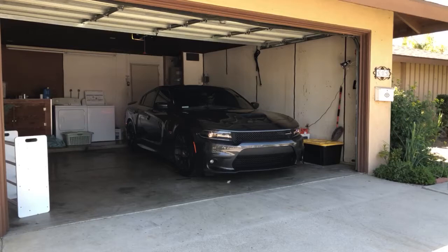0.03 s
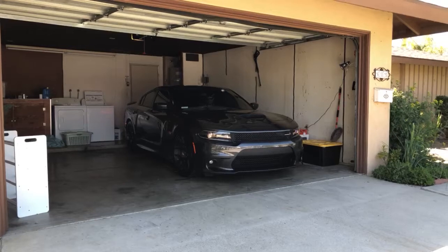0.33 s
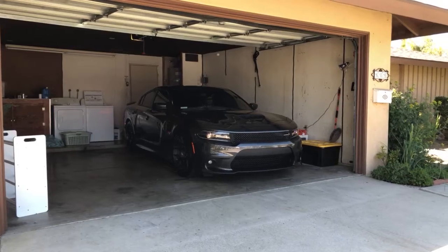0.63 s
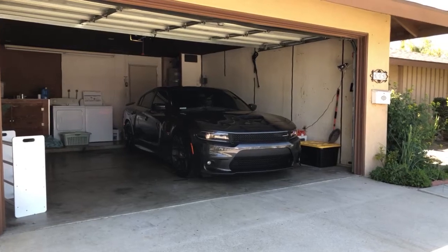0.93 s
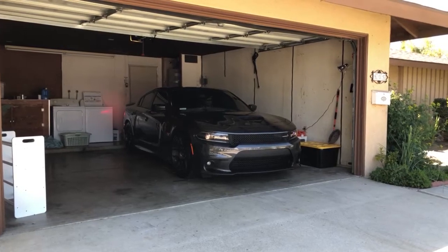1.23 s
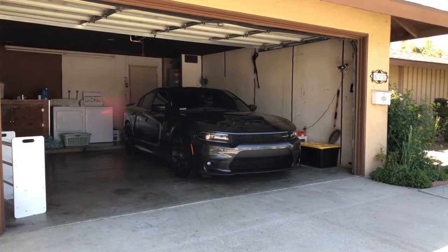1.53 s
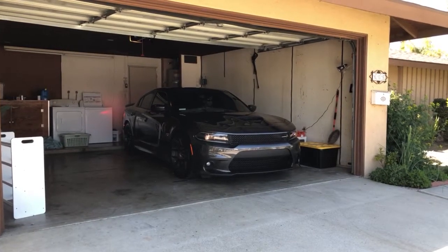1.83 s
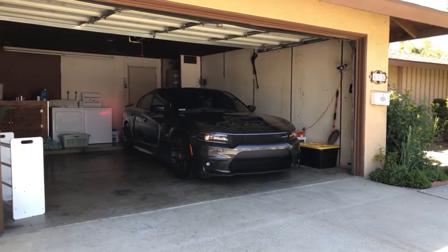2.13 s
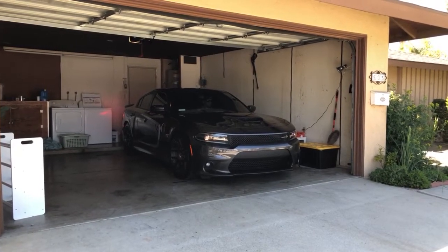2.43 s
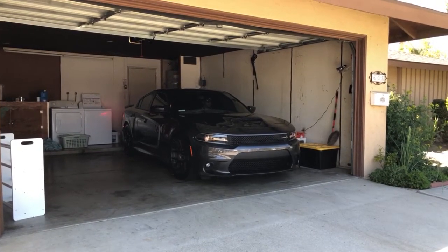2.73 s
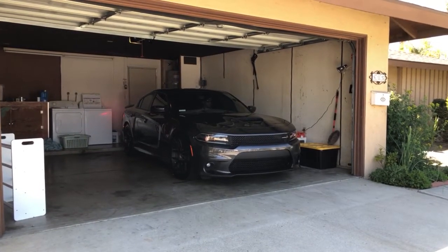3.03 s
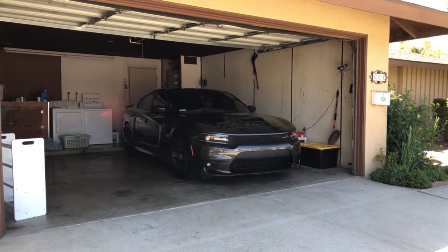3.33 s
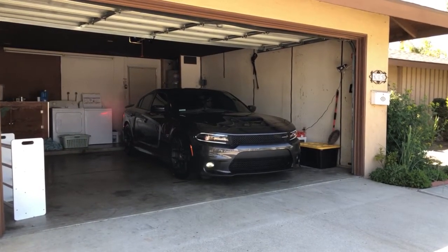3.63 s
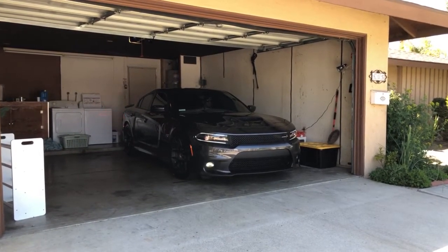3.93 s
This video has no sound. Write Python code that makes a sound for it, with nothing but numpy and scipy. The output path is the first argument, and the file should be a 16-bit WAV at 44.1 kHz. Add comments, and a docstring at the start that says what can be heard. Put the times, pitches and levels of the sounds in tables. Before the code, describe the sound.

A car engine starts up in an open garage, following quiet chirps and a low hum.

```python
"""An open garage, heard from the driveway: a V8 car starts from cold.
Small birds chirp and a far dove coos over a low neighbourhood hum. The starter pinion clacks in and its
gears grind through a few compression strokes. The engine catches, flares with a bark and settles,
each firing sending a pulse and a puff of gas down the pipes to boom between the garage walls."""
import sys
import numpy as np
from scipy import signal
from scipy.fft import rfft, irfft, next_fast_len
from scipy.io import wavfile
from scipy.ndimage import uniform_filter1d, map_coordinates

SR = 44100
rng = np.random.default_rng(int(sys.argv[2]) if len(sys.argv) > 2 else 0)


def dump(signal):
    """Clip the signal to [-1, 1] and save it as 16-bit WAV at the path in sys.argv[1]."""
    limited = np.clip(np.atleast_2d(signal).T, -1, 1)
    pcm = np.round(limited * 32767).astype(np.int16)
    wavfile.write(sys.argv[1], SR, pcm)


N = 176400

ENGAGE_S, RELEASE_S = 2.802, 3.56  # the starter goes in and lets go
# Reverb of the yard and of the garage. Each row: frequency in Hz, seconds to die by 60 dB.
YARD_DECAY = [(300, 0.63), (4000, 0.99), (12000, 0.58)]
GARAGE_DECAY = [(60, 0.49), (300, 0.4), (2000, 0.44), (6000, 0.3), (15000, 0.24)]


def amp(db):
    return 10 ** (np.asarray(db) / 20)


def unit(x):
    return x / np.sqrt(np.mean(x ** 2) + 1e-20)


def clock():
    return np.arange(N) / SR


def along(points, hz):
    """Read (Hz, value) points on a log frequency axis."""
    freqs, values = np.transpose(points)
    return np.interp(np.log(hz + 1), np.log(freqs + 1), values)


def curves(rows):
    """One automation curve for each column after the time."""
    times, *columns = np.transpose(rows)
    return [np.interp(clock(), times, column) for column in columns]


def wobble(rate):
    """A smooth random curve, rate knots a second."""
    knots = rng.standard_normal(int(N * rate / SR) + 4)
    return map_coordinates(knots, [np.arange(N) * rate / SR])


def filtered(x, response):
    """x through a complex frequency response."""
    size = next_fast_len(N + SR)
    return irfft(rfft(x, size) * response(np.fft.rfftfreq(size, 1 / SR)), size)[:N]


def colour(x, *spectra):
    """x through one or more (Hz, dB) EQ curves."""
    return filtered(x, lambda hz: amp(sum(along(s, hz) for s in spectra)))


def noise(*spectra):
    """Coloured noise of rms 1."""
    return unit(colour(rng.standard_normal(N), *spectra))


def resonate(x, modes):
    """x through a bank of resonances of alternating polarity."""
    return filtered(x, lambda f: sum(
        (-1) ** k * amp(db) * 1j * f * width / (centre ** 2 - f ** 2 + 1j * f * width)
        for k, (centre, width, db) in enumerate(modes)))


def steady(x, size=1500):
    """x levelled to a running rms of 1."""
    return x / np.sqrt(np.abs(uniform_filter1d(x * x, size)) + 1e-5 * np.mean(x * x))


def gate(start, rise, hold=9, fall=1):
    """Attack, hold and exponential release, in seconds."""
    t = clock() - start
    return np.clip(t / rise, 0, 1) * np.exp(-np.maximum(t - hold, 0) / fall)


def room(x, decay, wet):
    """x with a diffuse tail in which each frequency dies at its own speed."""
    hz, t, spectrum = signal.stft(rng.standard_normal(SR), SR, nperseg=256)
    fade = amp(-60 * t / along(decay, hz)[:, None])
    tail = signal.istft(spectrum * fade, SR, nperseg=256)[1]
    return x + wet * signal.fftconvolve(x, tail / np.linalg.norm(tail))[:N]


def neighbourhood():
    """The bed: distant rumble, faint hiss and the wavering hum of a machine."""
    # Outdoor air. Each row: frequency in Hz, gain in dB.
    rumble_eq = [(15, -53), (28, -33), (42, -6.5), (68, -13.5), (90, -1), (135, 0), (157, -8.5), (185, -5),
                 (207, -13), (232, -9.5), (270, -17.5), (295, -16.5), (340, -17.5), (380, -25.5),
                 (700, -27), (1200, -28), (1900, -37), (2700, -48.5), (5000, -54.5)]
    hiss_eq = [(1000, -25), (2500, 2), (6000, 6), (9000, -16), (15000, -27)]
    # Machine tones. Each row: pitch in Hz, relative level in dB.
    hum_tones = [(96.9, -53), (188.4, -60), (226.1, -63.5), (290.7, -63)]
    hum = np.zeros(N)
    for hz, db in hum_tones:
        level = np.sqrt(2) * amp(db - 0.5 + 1.85 * wobble(6.02))
        hum += level * np.sin(2 * np.pi * hz * clock() + 0.95 * wobble(11))
    return hum + amp(-48.5) * noise(rumble_eq) + amp(-71.5) * noise(hiss_eq)


def tick():
    """One small, bright tick in the yard."""
    # Its colour. Each row: frequency in Hz, gain in dB.
    tick_eq = [(2000, -25), (5000, -5), (6500, 8), (9000, -3), (12000, -25)]
    return amp(-56.5) * gate(1.716, rise=.001, hold=0, fall=0.0043) * noise(tick_eq)


def sing(shape, repeats, waver):
    """A bird's gliding tone with a faint octave, wavering differently on each repeat."""
    out = np.zeros(N)
    times, hz, db = np.transpose(shape)
    for start, level_db in repeats:
        t = clock() - start
        pitch = np.interp(t, times, hz) * (1 + waver * wobble(700))
        phase = 2 * np.pi * np.cumsum(pitch) / SR
        level = amp(level_db + np.interp(t, times, db)) * gate(start, 0.0017, times[-1], 0.0035)
        out += level * (np.sin(phase) + amp(-30) * np.sin(2 * phase))
    return out


def dove():
    """A far dove: soft coos that sag in pitch."""
    # One coo. Each row: seconds into it, base pitch in Hz, relative level in dB.
    coo = [(0, 556, -8), (.05, 550, 5), (.12, 542, 4), (.19, 522, -21)]
    # Its cues. Each row: start in seconds, gain in dB, pitch ratio.
    cues = [(.43, -70, .98), (1.73, -68, 1.25), (2.47, -63, 1)]
    coos = sum(sing(np.array(coo) * [1, ratio, 1], [(start, db)], waver=0.0056)
               for start, db, ratio in cues)
    return room(coos, YARD_DECAY, wet=0.65)


def songbirds():
    """Fluttering song in the yard; calls, warble and chips also echo off the houses."""
    # Song shapes. Each row: seconds into the phrase, pitch in Hz, relative level in dB.
    two_part_call = [(0, 5400, -3), (.01, 5820, -0.5), (.026, 6100, 0), (.04, 5300, -1), (.052, 4300, 5),
                     (.066, 3900, -6), (.085, 3730, -2.5), (.1, 3900, 4), (.122, 4477, 3.5),
                     (.145, 4950, -9.5)]
    near_warble = [(0, 3220, -19), (.04, 3570, -6), (.066, 4890, -6), (.082, 4690, 10), (.097, 4550, -3),
                   (.11, 3400, -3), (.14, 3820, -4), (.16, 4650, -8), (.175, 3500, -12), (.2, 4040, -28)]
    rising_chip = [(0, 3484, -12), (.025, 3720, -3.5), (.05, 4900, -4.5)]
    arched_whistle = [(0, 2184, -10), (.02, 3100, -7.5), (.05, 4830, -5), (.065, 4200, 4),
                      (.085, 3316, -3.5), (.11, 2260, -6)]
    # Their cues. Each row: start in seconds, gain in dB.
    call_cues = [(.752, -59.5), (1.054, -58), (1.337, -57.5), (1.815, -58), (2.118, -57.5), (2.51, -65.5)]
    warble_cues = [(0.091, -51.5)]
    chip_cues = [(0.431, -61), (.53, -54), (1.58, -69), (2.36, -73)]
    whistle_cues = [(.05, -65), (0.632, -66), (1.276, -59), (2.105, -60.5), (2.7, -60)]
    # Slaps off the house walls. Each row: delay in seconds, gain in dB.
    slaps = [(.008, -5.5), (.019, -6), (0.164, -9)]
    phrases = [(two_part_call, call_cues), (near_warble, warble_cues), (rising_chip, chip_cues)]
    song = sum(sing(shape, cues, waver=.018) for shape, cues in phrases)
    flutter = amp(4.5 * wobble(110))
    song *= flutter
    echoes = sum(amp(db) * np.interp(clock() - delay, clock(), song) for delay, db in slaps)
    whistles = flutter * sing(arched_whistle, whistle_cues, waver=.02)
    return room(amp(-1) * (song + echoes), YARD_DECAY, wet=0.64) + room(whistles, YARD_DECAY, wet=0.65)


def starter():
    """The gears whirr and whine, rattling harder each time a piston comes up on compression."""
    # Compression strokes. Each row: start and length in seconds, whirr and hiss levels in dB.
    strokes = [(2.814, 0.086, -40, -54), (2.935, 0.12, -40, -56), (3.138, 0.058, -36.5, -47),
               (3.265, .065, -37.5, -48.5), (3.401, .04, -38, -45.5), (3.495, .06, -43.5, -47)]
    # Labouring whine. Each row: time in seconds, pitch in Hz, level in dB.
    whine_path = [(2.83, 1020, -38.5), (2.91, 1010, -55), (2.945, 986.4, -28), (2.98, 967, -40),
                  (3.035, 880, -40), (3.1, 860, -60), (3.15, 1073, -37), (3.18, 1045, -31.5),
                  (3.2, 896, -32.5), (3.25, 880, -56), (3.3, 1030, -39), (3.38, 880, -41.5),
                  (3.43, 1100, -52), (3.5, 1000, -51)]
    # Gear noise: its peaks, overall tilt and hiss. Each row: frequency in Hz, gain in dB.
    gear_peaks = [(180, -30), (300, -9.5), (351, -25), (440, -10.5), (522, -19), (572, -10), (644, -15),
                  (725, -5.5), (944, -4), (1500, -10.5), (2080, -10.5), (2540, -17), (2970, -12.5),
                  (4470, -14), (7000, -20.5), (9100, -52), (15400, -120)]
    gear_tilt = [(100, -18), (350, 0.5), (4500, 1), (7000, -5), (15000, -29)]
    hiss_eq = [(1500, -28), (4000, -11), (6200, 0.5), (9000, -8.5), (12000, -14), (15500, -25)]
    mesh_hz = 117.4 * (1 + .12 * wobble(12))
    teeth = np.exp(0.13 * np.sin(2 * np.pi * np.cumsum(mesh_hz) / SR))
    rattle = unit(teeth * amp(0.87 * wobble(400)))
    engaged = gate(ENGAGE_S, rise=0.013, hold=RELEASE_S - ENGAGE_S, fall=0.036)
    whirr_level, hiss_level = amp(-45.5) * engaged, amp(-57.5) * engaged
    for start, length, whirr_db, hiss_db in strokes:
        whirr_level += amp(whirr_db) * gate(start, rise=0.0073, hold=length, fall=0.04)
        hiss_level += amp(hiss_db) * gate(start, rise=0.0073, hold=length, fall=0.03)
    whine_hz, whine_db = curves(whine_path)
    phase = 2 * np.pi * np.cumsum(whine_hz) / SR + 0.37 * wobble(130)
    whine = engaged * amp(whine_db) * (np.sin(phase) + amp(-11.5) * np.sin(2 * phase))
    gears = whirr_level * noise(gear_peaks, gear_tilt) + hiss_level * noise(hiss_eq) + whine
    return room(rattle * gears, GARAGE_DECAY, wet=0.49)


def solenoid():
    """The pinion slams into the ring gear and rings the housing."""
    # The impact. Each row: frequency in Hz, gain in dB.
    crack_eq = [(120, -50), (200, -18), (827, -12.5), (1010, -3.5), (1880, -17), (2130, -10), (2650, -18),
                (4100, -13.5), (5390, -14), (6960, -8), (15500, -38)]
    # Housing modes. Each row: pitch in Hz, relative level in dB, seconds to die by 60 dB.
    housing = [(1009, -7.5, .16), (1417, -6.5, 0.091), (1806, -17, .2), (2137, 4.5, 0.079),
               (4005, -11, 0.19), (4540, -11, .05), (6640, -2, 0.087)]
    crack_t60_s = 0.046
    t = np.maximum(clock() - ENGAGE_S, 0)
    crack = amp(-14.5 - 60 * t / crack_t60_s) * noise(crack_eq)
    ring = sum(amp(db - 60 * t / t60) * np.sin(2 * np.pi * hz * t + .5 * wobble(120))
               for hz, db, t60 in housing)
    clack = gate(ENGAGE_S, rise=0.0061) * (crack + amp(-24.5) * ring)
    return room(clack, GARAGE_DECAY, wet=0.8)


def intake():
    """Air and belts hiss as the engine picks up."""
    # The swell. Each row: time in seconds, relative level in dB.
    swell = [(3.48, -55), (3.5, -43.5), (3.55, -41), (3.582, -35.5), (3.616, -42.5), (3.72, -44),
             (3.8, -48), (4.0, -49.5)]
    # Its colour. Each row: frequency in Hz, gain in dB.
    hiss_eq = [(500, -27), (2500, 5.5), (5000, -1), (8200, -1), (10000, -8), (15500, -15.5)]
    swell_db, = curves(swell)
    return gate(3.46, rise=.03) * amp(swell_db + 5.5 + .8 * wobble(200)) * noise(hiss_eq)


def engine():
    """Each firing sends a pulse and a puff of gas down the pipes into the garage."""
    # The rev flare. Each row: time in seconds, firing rate in Hz.
    revs = [(3.52, 42), (3.555, 58.04), (3.6, 78.2), (3.65, 97.24), (3.7, 112.4), (3.77, 123.2),
            (3.83, 122.5), (3.9, 113.9), (4.0, 103.4)]
    # Accent of each of the eight firings in a cycle, in dB.
    accents = [2, -0.5, 3, 4, 0.5, 4, 5, -2.5]
    # Exhaust faders. Each row: time in seconds, then tone, boom, bark and rasp in relative dB.
    faders = [(3.562, -18.5, -17, -17.5, -33.5), (3.606, -24, -17, -14, -37), (3.626, -13, -16, -14.5, -26),
              (3.638, -22, -20, -14, -28.5), (3.656, -27, -17, -14.5, -26), (3.734, -25.5, -23.5, -14, -32),
              (3.744, -22, -14.5, -12, -37), (3.77, -19.5, -14, -19, -34.5), (3.828, -20, -23.5, -22, -42),
              (3.928, -31.5, -23.5, -29.5, -47.5), (3.944, -44, -20.5, -25.5, -49),
              (3.972, -30, -21, -28.5, -44), (4.0, -27, -25.5, -28, -53)]
    # Low and mid resonances of pipes and garage. Each row: centre in Hz, width in Hz, gain in dB.
    boom_modes = [(197, 26.6, -3), (262, 40, -8.5), (289, 26, -3), (344.5, 13.8, 6), (437, 23.6, -2.5),
                  (517, 115, -9)]
    bark_modes = [(640, 196, -6), (800, 27, 2), (858.7, 17, 2.5), (954, 31, -4.5), (1020, 44, -3.5),
                  (1118, 140, -7), (1249, 62, -4.5), (1305.4, 30, -3), (1416, 90, -6), (1630, 46, -6.5),
                  (1793, 55, -9), (2052, 97, -7), (2300, 280, -12.5)]
    # EQ of each exhaust layer. Each row: frequency in Hz, gain in dB.
    tone_eq = [(25, -23), (45, -4), (70, -0.5), (130, 0.5), (160, -6)]
    boom_eq = [(30, -30), (90, 10), (200, 4), (500, -1.5), (900, -1), (2500, -45), (8000, -70)]
    bark_eq = [(100, -25), (450, -5), (800, 1), (2300, -1), (2900, -6.5), (5000, -18), (15000, -45)]
    rasp_eq = [(300, -42), (1800, 3.5), (2900, 0), (4300, -0.5), (5600, -9.5), (7000, -21.5), (9000, -28),
               (15000, -35)]
    catch_s, first_fire_s, puff_decay_s = 3.52, 3.554, 0.0021

    firing_hz, = curves(revs)
    count = np.cumsum(firing_hz) / SR  # climbs by one per firing
    count -= count[int(first_fire_s * SR)]
    uneven = np.maximum.accumulate(count + .13 * wobble(70))  # firings land early or late
    firing = np.floor(uneven).astype(int)
    running = gate(catch_s, rise=0.027)
    strength = amp(np.array(accents)[firing % len(accents)] + 2 * wobble(90)) * running
    pulses = unit(np.diff(firing, prepend=firing[0]) * strength)
    since_firing_s = (uneven - firing) / firing_hz
    flow = strength * (np.exp(-since_firing_s / puff_decay_s) + 0.21)  # gas flows between puffs too

    def puffs():
        return unit(flow * rng.standard_normal(N))

    boom = colour(resonate(pulses + 0.44 * puffs(), boom_modes), boom_eq)
    bark = colour(resonate(0.69 * pulses + puffs(), bark_modes), bark_eq)
    rasp = colour(puffs(), rasp_eq)
    # The firing tone, with a lope at a half and three quarters of its rate.
    tone = np.sin(2 * np.pi * count) + .25 * np.sin(np.pi * uneven) + .4 * np.sin(1.5 * np.pi * uneven)
    tone_db, boom_db, bark_db, rasp_db = curves(faders)
    exhaust = (amp(tone_db + 1.9 * wobble(40)) * colour(tone, tone_eq)
               + amp(boom_db + 0.5) * steady(room(boom, GARAGE_DECAY, wet=0.35))
               + amp(bark_db - 0.5) * steady(room(bark, GARAGE_DECAY, wet=0.75))
               + amp(rasp_db + 1) * steady(room(rasp, GARAGE_DECAY, wet=1.3)))
    cough_level = amp(-11) * running  # weak firings before the first full one
    return np.maximum(cough_level, gate(first_fire_s, rise=0.0052)) * exhaust


def scene():
    """The car and the yard in one mono mix."""
    car = engine() + intake() + solenoid() + starter()
    return (car + songbirds() + dove() + tick() + neighbourhood())[None]


def record(dry):
    """Open after a moment of silence, round off the tallest peaks and cut the extreme treble."""
    ceiling, top_hz = .72, 15850
    x = dry[0] * gate(.072, rise=0.0022)
    x = x / (1 + (x / ceiling) ** 8) ** (1 / 8)
    return filtered(x, lambda hz: hz < top_hz)[None]


dry = scene()
out = record(dry)
dump(out)
```